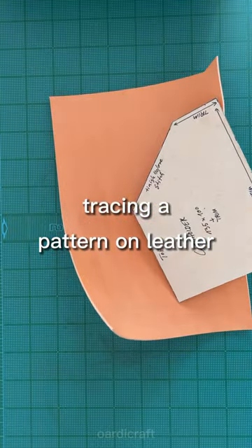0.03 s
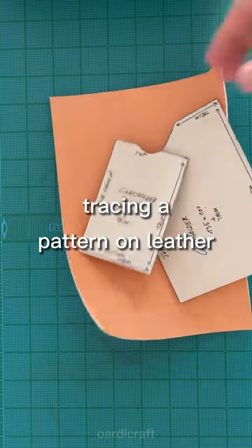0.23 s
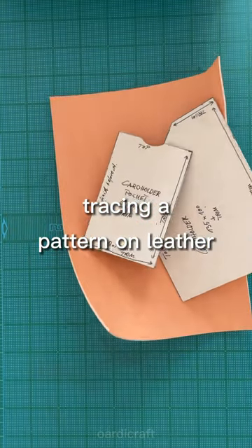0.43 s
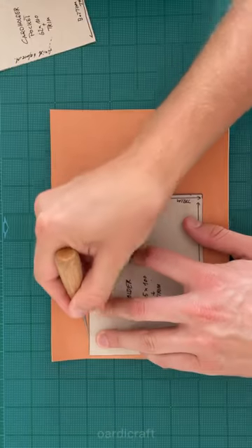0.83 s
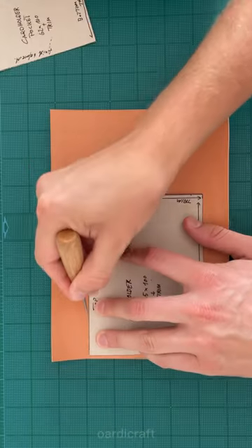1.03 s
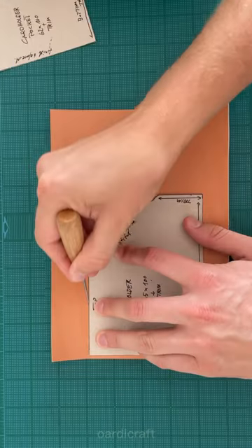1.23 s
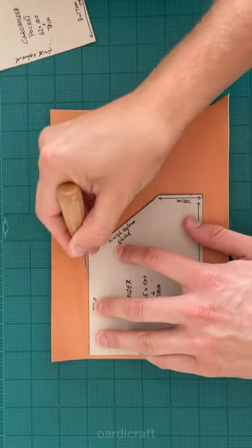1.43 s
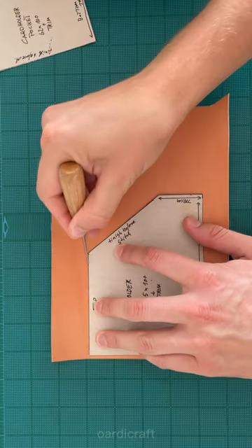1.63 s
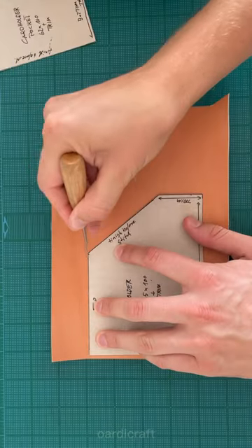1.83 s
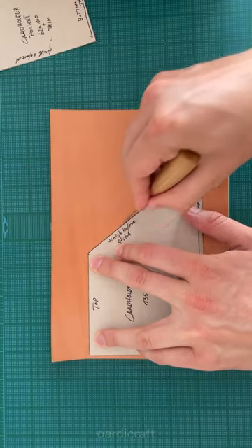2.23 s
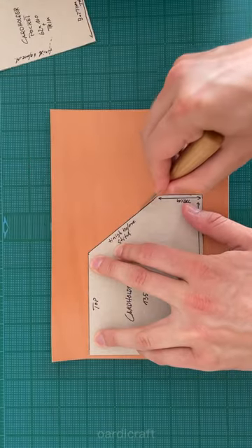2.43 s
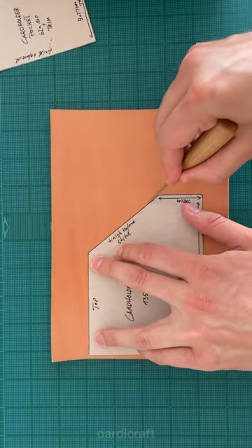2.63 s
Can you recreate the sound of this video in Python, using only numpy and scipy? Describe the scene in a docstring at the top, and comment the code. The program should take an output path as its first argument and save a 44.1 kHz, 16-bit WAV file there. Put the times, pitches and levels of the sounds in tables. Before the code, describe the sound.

In a small room, a stiff paper template clatters lightly onto leather and a hand settles. An awl then scrapes along its edge twice near the microphone, first dull and rumbling, then scratchier, ticking as the point catches.

```python
"""An awl is drawn along a paper template's edge in two strokes: the point stutters over the grain,
mat and table rumble (brighter as the hand speeds up) and the fibres scratch and tick.
Before that, the stiff template brushes the fingers, drops on leather on a cutting mat, clatters
briefly and slides to rest; a soft swish falls and a hand settles. Small room, quiet room tone."""
import sys
import numpy as np
from scipy import signal
from scipy.fft import rfft, irfft, next_fast_len
from scipy.io import wavfile
from scipy.ndimage import uniform_filter1d, minimum_filter1d, map_coordinates

SR = 44100
rng = np.random.default_rng(int(sys.argv[2]) if len(sys.argv) > 2 else 0)


def store_wav(level_fs):
    """Save 16-bit WAV to argv[1]."""
    pcm = np.round(np.clip(np.atleast_2d(level_fs), -1, 1) * 32767)
    wavfile.write(sys.argv[1], SR, pcm.T.astype(np.int16))


N = 119070


def amp(db):
    """Decibels to gain."""
    return 10 ** (np.asarray(db) / 20)


def unit(x):
    """Scale to rms 1."""
    return x / np.sqrt(np.mean(x ** 2) + 1e-20)


def along(points, hz):
    """Interpolate (freq_hz, value) points on a log axis."""
    freq_hz, value = np.transpose(points)
    return np.interp(np.log(hz + 1), np.log(freq_hz + 1), value)


def envelope(time_s, level_db):
    """Gain curve through the points, silent outside them."""
    return amp(np.interp(np.arange(N) / SR, time_s, level_db, left=-120, right=-120))


def bells_db(hz, resonances):
    """Summed resonance curves from (centre_hz, width_hz, lift_db) rows."""
    return sum(db / (1 + (2 * (hz - centre) / width) ** 2) for centre, width, db in resonances)


def filtered(x, response):
    """Apply a frequency response."""
    size = next_fast_len(N + SR // 2)
    return irfft(rfft(x, size) * response(np.fft.rfftfreq(size, 1 / SR)), size)[..., :N]


def wobble(knots_per_s):
    """Smooth random curve."""
    knots = rng.standard_normal(int(N * knots_per_s / SR) + 4)
    return map_coordinates(knots, [np.arange(N) * knots_per_s / SR])


def click(gain, size=2048):
    """Minimum-phase click of peak 1, shaped by gain(hz)."""
    cepstrum = irfft(np.log(np.maximum(gain(np.fft.rfftfreq(size, 1 / SR)), 1e-6)))
    cepstrum[1:size // 2] *= 2
    cepstrum[size // 2 + 1:] = 0
    pulse = irfft(np.exp(rfft(cepstrum)))
    return pulse / np.abs(pulse).max()


def burst(t, t60_s, onset=1):
    """Decaying noise of energy 1."""
    noise = rng.standard_normal(len(t)) * amp(-60 * t / t60_s) * onset
    return noise / np.linalg.norm(noise)


def grains(per_s, scatter_db):
    """Two streams of random impulses of uneven size."""
    hits = rng.random((2, N)) < per_s / SR
    signs = np.sign(rng.standard_normal((2, N)))
    sizes = amp(scatter_db * np.clip(rng.standard_normal((2, N)), -2, 2))
    return unit(hits * signs * sizes)


def add(track, start_s, sound):
    """Mix a sound into a track."""
    part = track[..., round(start_s * SR):][..., :sound.shape[-1]]
    part += sound[..., :part.shape[-1]]


# width of scattered sound: freq_hz, side_over_mid_db
WIDTH = [(60, -28), (180, -21), (400, -8.5), (750, -4.5), (1250, -1.5), (2100, -19.5), (2900, -17.5),
         (4500, -37.5), (6000, -6.5), (8000, -6.5), (10000, -39.5), (13300, -25), (15500, -0.5)]
def spread(pair):
    """Two unrelated signals to left and right, as alike as scattered sound is."""
    side = filtered(pair[1], lambda hz: amp(along(WIDTH, hz)))
    return np.array([pair[0] + side, pair[0] - side])


def coloured(pair, colour):
    """Stereo texture of rms 1 with the given colour."""
    return unit(spread(filtered(pair, lambda hz: amp(along(colour, hz)))))


# room decay: freq_hz, t60_s
ROOM_DECAY = [(100, 0.56), (500, 0.45), (1500, 0.42), (4000, 0.5), (8000, 0.46), (15000, 0.26)]
# reverb spectrum: freq_hz, gain_db
ROOM_COLOUR = [(100, -0.5), (350, 6), (900, -3.5), (2000, 0.5), (3000, 3), (5000, -1.5), (9000, 1),
               (15000, 1.5)]
def room(x, build_s=0.011):
    """Small-room reverb; each frequency dies at its own rate."""
    hz, t, spectrum = signal.stft(rng.standard_normal((2, N)), SR, nperseg=256)
    decay = amp(along(ROOM_COLOUR, hz)[:, None] - 60 * t / along(ROOM_DECAY, hz)[:, None])
    build = 1 - np.exp(-t / build_s)
    tail = spread(signal.istft(spectrum * decay * build, SR, nperseg=256)[1][:, :N])
    return signal.fftconvolve(x[None], tail / np.linalg.norm(tail[0]), axes=1)[:, :N]


def rubs(touches, colour, wet_db=-10.5):
    """Short soft friction: bell-shaped swells of noise."""
    t = np.arange(N) / SR
    level = sum(amp(db) * np.exp(-((t - centre_s) / half_s) ** 2 / 2) for centre_s, half_s, db in touches)
    direct = level * coloured(rng.standard_normal((2, N)), colour)
    return direct + amp(wet_db) * room(direct[0])


# room tone spectrum: freq_hz, gain_db
TONE_COLOUR = [(20, -14), (45, -5), (72, 2), (110, -2), (200, -10.5), (400, -19.5), (800, -25.5),
               (2000, -32), (6000, -37.5), (9000, -38), (11000, -49), (16000, -48)]
def room_tone(level_db=-52):
    """Steady, bass-heavy background noise."""
    return amp(level_db) * coloured(rng.standard_normal((2, N)), TONE_COLOUR)


# paper on fingers: centre_s, half_length_s, level_db
BRUSHES = [(.061, .009, -55), (.0688, .0035, -46.5), (.078, .0018, -43.5)]
# brush spectrum: freq_hz, gain_db
BRUSH_COLOUR = [(300, -21), (800, -16), (1300, -2.5), (3000, -1), (4600, 1), (6000, -7.5), (9000, -9),
                (16000, -25.5)]
def finger_brush():
    """Paper brushes the fingers as it is let go."""
    return rubs(BRUSHES, BRUSH_COLOUR)


# template contacts: start_s, level_db, corner_hz, snap_re_blow_db
CONTACTS = [(.1835, -5, 2150, -24), (0.1873, -10.5, 1900, -34.5), (.191, -15, 2200, -26.5),
            (0.2028, -11, 2000, -42), (.2052, -11.5, 1300, -50.5), (0.2063, -6.5, 1347, -50),
            (0.2142, 0, 4500, -21.5), (.2195, -15.5, 2200, -41.5), (0.2278, -10, 2800, -33.5),
            (0.2369, -13, 3000, -26), (.2566, -18.5, 6000, -17), (.2580, -11, 4500, -21),
            (0.2628, 0.5, 7920, -13), (0.2706, -11, 4000, -23.5)]
# template on the mat: freq_hz, gain_db
BLOW_COLOUR = [(60, -21), (170, -8), (300, -7.5), (550, -9.5), (900, -2.5), (1250, -2.5), (1700, 1.5),
               (2150, -4), (2800, -9.5), (3850, -9), (4700, -11.5), (7000, -12), (9500, -16),
               (13000, -25.5), (15500, -22)]
# stiff edge flicking down: freq_hz, gain_db
SNAP_COLOUR = [(1000, -25), (4000, -10.5), (6800, -0.5), (8500, -2), (10200, 0), (12500, -12), (15000, -2),
               (16500, -8.5)]
# direct radiation to the microphone: freq_hz, gain_db
BEAM_COLOUR = [(150, -3), (280, -7.5), (500, -1), (900, 2.5), (1700, 1.5), (2200, 3), (2800, -5),
               (3850, 5.5), (4700, 1.5), (5400, -1), (7000, 3.5), (9000, 4.5)]
def template_drop(lag_at_1khz_s=0.0007, pan_db=-0.9, wet_db=-6.5):
    """Edges and face land in turn; each blow has a bright snap and a short rattle."""
    blows, snaps = np.zeros((2, N))
    t = np.arange(SR // 16) / SR
    edge = click(lambda hz: amp(along(SNAP_COLOUR, hz)))
    rattle_onset = 1 - np.exp(-(t / 0.00066) ** 2)
    for start_s, level_db, corner_hz, snap_db in CONTACTS:
        blow = click(lambda hz: amp(along(BLOW_COLOUR, hz)) / np.sqrt(1 + (hz / corner_hz) ** 6))
        rattle = amp(-2.5) * burst(t, t60_s=0.019, onset=rattle_onset)
        rattle[0] = 1  # the blow itself
        add(blows, start_s, amp(level_db) * signal.fftconvolve(blow, rattle))
        crack = burst(t, t60_s=0.0044)
        add(snaps, start_s, amp(level_db + snap_db) * signal.fftconvolve(edge, crack))
    # bending waves: higher tones arrive sooner
    dispersion = lambda hz: np.exp(-4j * np.pi * lag_at_1khz_s * np.sqrt(1000 * hz))
    blows, snaps = filtered(np.array([blows, snaps]), dispersion)
    direct = filtered(blows, lambda hz: amp(along(BEAM_COLOUR, hz))) + snaps
    return direct * amp(pan_db * np.array([[.5], [-.5]])) + amp(wet_db) * room(blows)


# paper on leather: centre_s, half_length_s, level_db
SLIDES = [(.402, .006, -47), (.451, .005, -46), (.492, 0.014, -54.5)]
# slide spectrum: freq_hz, gain_db
SLIDE_COLOUR = [(200, -13), (700, -4.5), (1500, 1), (2600, -4), (4100, -5.5), (5200, -17), (9000, -19),
                (16000, -39)]
def template_slide():
    """The template slides a little as it comes to rest."""
    return rubs(SLIDES, SLIDE_COLOUR)


# swish as things settle: time_s, centre_hz, level_db
SWISH = [(.545, 2190, -76), (.57, 1890, -61.5), (.58, 1394, -54.5), (0.591, 952, -65), (.62, 596, -68)]
def swish(width_octaves=0.2):
    """A soft rub whose resonance sinks as it swells and fades."""
    time_s, centre_hz, level_db = np.transpose(SWISH)
    hz, t, spectrum = signal.stft(spread(rng.standard_normal((2, N))), SR, nperseg=256)
    offset_octaves = np.log2((hz[:, None] + 1) / np.interp(t, time_s, centre_hz))
    band = np.exp(-(offset_octaves / width_octaves) ** 2 / 2)
    band /= np.linalg.norm(band, axis=0)
    rub = unit(signal.istft(spectrum * band, SR, nperseg=256)[1][:, :N])
    return rub * envelope(time_s, level_db)


# hand on leather: centre_s, half_length_s, level_db
PATS = [(.58, 0.0099, -55), (.617, 0.016, -55.5)]
# pat spectrum: freq_hz, gain_db
PAT_COLOUR = [(100, 0), (480, 4.5), (900, -13), (1500, -15.5), (2500, -26), (8000, -34), (16000, -48)]
def hand_pats():
    """A hand settles on the leather."""
    return rubs(PATS, PAT_COLOUR)


# strokes up the side, then along the slant: time_s, rumble_db, corner_hz, bass_lift_db, scratch_db
SIDE_STROKE = [(.67, -61, 219, 0, -84), (.71, -51.5, 280, 0.5, -60.5), (.77, -45.5, 316, -8.5, -60.5),
               (.81, -40.5, 306, -5, -58.5), (.92, -36.5, 338, 4.5, -58), (.985, -44.5, 374, -15, -59),
               (1.04, -38.5, 343, 7, -56), (1.11, -39, 340, 3, -57.5), (1.16, -38, 390, -1.5, -56),
               (1.27, -37, 463, -5, -52), (1.49, -36.5, 630, -5, -53.5), (1.59, -36.5, 496, -3, -58),
               (1.67, -53, 310, 2, -63), (1.70, -43.5, 327, 2.5, -60.5), (1.735, -40, 296, 8.5, -64.5),
               (1.77, -64.5, 218, 3, -73), (1.83, -53, 220, 7, -76), (1.91, -63, 200.4, 2, -84)]
SLANT_STROKE = [(1.925, -66, 400, -1, -72), (1.945, -39, 784, 4.5, -52), (1.985, -29, 870, 2.5, -45),
                (2.05, -32, 840, 5, -47), (2.085, -30, 840, 4, -43), (2.12, -29.5, 930, -10, -41),
                (2.18, -30.5, 940, -9, -43), (2.31, -31, 870, -7, -45.5), (2.355, -33, 785, 6, -49.5),
                (2.45, -39.5, 816, 10.5, -54), (2.55, -39.5, 730, 5.5, -53.5), (2.6, -46, 502, 2.5, -58),
                (2.64, -39, 393, 12.5, -64), (2.7, -61, 320, 7, -61.5)]
# mat and table response: freq_hz, gain_db
TABLE_COLOUR = [(25, -29), (50, -13), (85, -2), (170, -0.5), (230, -4.5), (400, -5.5), (800, -5),
                (2000, -14)]
# mat and table modes: centre_hz, width_hz, lift_db
TABLE_MODES = [(86, 12, 7.5), (126.4, 26, 5.5), (163.5, 6.3, 4.5), (187.5, 12, 7.5), (286.4, 36, 6.5)]
def rumble(stroke, roll_off_order=4.24, bass_hz=171):
    """Slips of the point shake mat and table in lumps; a faster hand opens the rumble upward."""
    time_s, level_db, corner_hz, bass_lift_db, _ = np.transpose(stroke)
    slips = grains(per_s=1800, scatter_db=2.2)
    lumps = amp(wobble(knots_per_s=35))
    body = lambda hz: amp(along(TABLE_COLOUR, hz) + bells_db(hz, TABLE_MODES))
    hz, t, spectrum = signal.stft(spread(filtered(slips * lumps, body)), SR, nperseg=1024)
    lowpass = 1 / np.sqrt(1 + (hz[:, None] / np.interp(t, time_s, corner_hz)) ** (2 * roll_off_order))
    bass_shelf = amp(np.interp(t, time_s, bass_lift_db) / (1 + (hz[:, None] / bass_hz) ** 4))
    shake = unit(signal.istft(spectrum * lowpass * bass_shelf, SR, nperseg=1024)[1][:, :N])
    return shake * envelope(time_s, level_db)


# scratch spectrum at each awl angle: freq_hz, gain_db
SIDE_COLOUR = [(300, -1), (1200, -4.5), (2100, -1), (3200, -2), (3800, -1.5), (4600, -1), (6000, -3),
               (7500, -4), (9000, -8), (10500, -16), (13000, -13.5), (15200, -3), (16500, -19)]
SLANT_COLOUR = [(300, -1.5), (1100, -4), (1600, 2.5), (2300, -4), (3100, -4.5), (3700, -3), (4500, 1),
                (5400, -3.5), (7000, -6), (9000, -15.5), (11000, -25.5), (13200, -12), (15200, -3),
                (16500, -22.5)]
# hand-to-leather gap resonances: time_s, low_hz, low_db, mid_hz, mid_db, high_hz, high_db, dip_db
SIDE_HOLLOW = [(.74, 3100, 3.5, 4850, 2, 7000, 3.5, -3), (.8, 3050, 10.5, 4960, 6, 6850, 9, 0),
               (.92, 2880, 6, 5030, 9.5, 7300, 10, 3.5), (1.1, 2800, 8.5, 5220, 4.5, 6840, 4, -1),
               (1.19, 3040, 6, 5200, 8.5, 6600, 6, -14), (1.32, 3090, -2, 5350, 9, 6500, -1, -14),
               (1.48, 2590, 5, 5300, 2, 6700, 10, 3), (1.6, 2340, 10.5, 5200, 4, 6600, 4, -3),
               (1.71, 2230, 14, 5000, -4, 6700, 3, -3), (1.77, 2060, 0, 5000, 3.5, 6800, 3, 2)]
SLANT_HOLLOW = [(1.95, 3337, 8, 5450, 4, 6430, 5.7, 1), (2.04, 3200, 6.5, 5500, 3.1, 6430, 3.8, -3.5),
                (2.09, 2970, 5, 5230, 5, 6560, 5, -9), (2.15, 2850, 13, 5000, 6, 6000, 1.2, -10),
                (2.28, 2930, 9.5, 5140, 6.7, 5670, 5.5, -5.5), (2.44, 2990, 10, 5460, 6, 5800, 9.6, -5),
                (2.59, 2900, 14, 5400, 12, 5850, 5.9, 1), (2.7, 2980, 7, 5380, 9.8, 5840, 3.5, -1.5)]
# resonance widths: low_hz, mid_hz, high_hz
SIDE_WIDTHS_HZ = [450, 750, 500]
SLANT_WIDTHS_HZ = [410, 400, 330]
def scratch(stroke, colour, hollow, widths_hz, stutter_db=0.67, patchy_db=1.95, dip_width_hz=550):
    """Fibres part under the point in stuttering clumps, heard through the hand's changing hollow."""
    time_s, *_, level_db = np.transpose(stroke)
    fibres = grains(per_s=2500, scatter_db=1) + 0.35 * rng.standard_normal((2, N))
    snags = amp(-10) * grains(per_s=92, scatter_db=1)  # larger fibres snapping
    stutter = amp(stutter_db * wobble(knots_per_s=220))
    hz, t, spectrum = signal.stft(coloured((fibres + snags) * stutter, colour), SR, nperseg=512)
    hollow_s, *columns = np.transpose(hollow)
    tracks = [np.interp(t, hollow_s, column) for column in columns]
    low_hz, low_db, mid_hz, mid_db, high_hz, high_db, dip_db = tracks
    resonances = zip([low_hz, mid_hz, high_hz], widths_hz, [low_db, mid_db, high_db])
    antiresonance = (1.26 * low_hz, dip_width_hz, dip_db)
    lift_db = bells_db(hz[:, None], [*resonances, antiresonance])
    # chance changes of colour along the grain
    patches = uniform_filter1d(rng.standard_normal(spectrum.shape[1:]), size=4, axis=0)
    patches = unit(uniform_filter1d(patches, size=20, axis=1))
    spectrum *= amp(lift_db + patchy_db * patches)
    texture = unit(signal.istft(spectrum, SR, nperseg=512)[1][:, :N])
    return texture * envelope(time_s, level_db)


# point catching: start_s, level_db, treble_tilt_db
CATCHES = [(1.938, -38.5, -2.5), (1.9647, -31, 0), (1.9745, -31.5, -1.5), (2.0585, -31, -1.5),
           (2.0790, -28, -1), (2.159, -28.5, -3), (2.315, -28.5, -1.5), (2.372, -34, -1),
           (2.3765, -26.5, -0.5), (2.388, -33.5, -1.5), (2.432, -28.5, -3), (2.439, -31.5, -1.5),
           (2.448, -33, -2), (2.472, -35, -1.5), (2.52, -34.5, -2.5), (2.5697, -23.5, 1.5)]
# tick spectrum: freq_hz, gain_db
TICK_COLOUR = [(500, -28), (2100, -18.5), (2950, 8.5), (3800, -1), (5400, 2), (7500, -3.5), (11500, -16),
               (16000, -6)]
def catches(pivot_hz=4000):
    """The point catches on the edge with a tick; a few fibres tear just after."""
    ticks = np.zeros(N)
    t = np.arange(SR // 32) / SR
    for start_s, level_db, tilt_db in CATCHES:
        tick = click(lambda hz: amp(along(TICK_COLOUR, hz) + tilt_db * np.log2(1 + (hz / pivot_hz) ** 2)))
        tear = amp(-1) * burst(t, t60_s=0.012)
        tear[0] = 1  # the tick itself
        add(ticks, start_s, amp(level_db) * signal.fftconvolve(tick, tear / np.linalg.norm(tear)))
    return ticks


def awl(wet_db=-6.5):
    """Two strokes rumble and scratch; the point catches during the second."""
    shake = rumble(SIDE_STROKE) + rumble(SLANT_STROKE)
    fibres = scratch(SIDE_STROKE, SIDE_COLOUR, SIDE_HOLLOW, SIDE_WIDTHS_HZ)
    fibres += scratch(SLANT_STROKE, SLANT_COLOUR, SLANT_HOLLOW, SLANT_WIDTHS_HZ)
    direct = amp(-2) * shake + amp(1.5) * fibres + amp(4.5) * catches()
    return direct + amp(wet_db) * room(direct.mean(axis=0))


def scene():
    """Template, hand and awl over the room tone."""
    return room_tone() + finger_brush() + template_drop() + template_slide() + swish() + hand_pats() + awl()


# microphone port balance: freq_hz, left_minus_right_db
PORT_BALANCE = [(80, 0), (200, -1.2), (600, -2), (1100, -1.5), (2100, 0.5), (16000, -3)]
# microphone port phase: freq_hz, left_lead_rad
PORT_PHASE = [(100, 0), (500, .15), (1000, .28), (1800, -.05), (2900, -.35), (4200, -.25), (5100, -.15),
              (6200, -1.5), (8000, -2.2), (9800, -2.95), (13400, -3.3), (15500, -4.3)]
def record(dry, top_hz=16100):
    """Two close ports turn the treble out of phase; a limiter holds the peaks; the top is cut off."""
    sides = np.array([[.5], [-.5]])
    balance = lambda hz: amp(sides * along(PORT_BALANCE, hz))
    phase = lambda hz: np.exp(1j * sides * along(PORT_PHASE, hz))
    ports = filtered(dry, lambda hz: balance(hz) * phase(hz))
    needed_gain = 1 / np.maximum(np.abs(ports).max(axis=0), 1)
    limiter_gain = uniform_filter1d(minimum_filter1d(needed_gain, size=160), size=120)
    return filtered(ports * limiter_gain, lambda hz: hz < top_hz)


dry = scene()
out = record(dry)
store_wav(out)
```